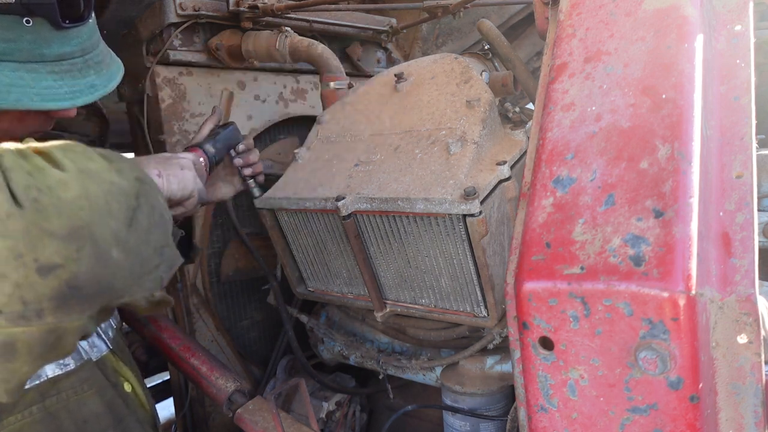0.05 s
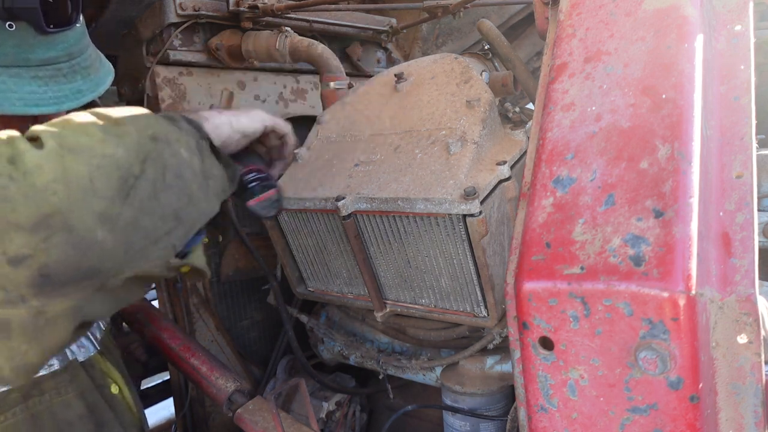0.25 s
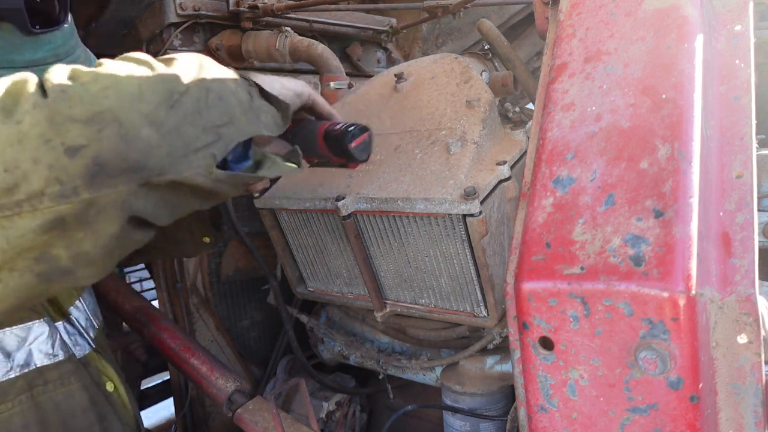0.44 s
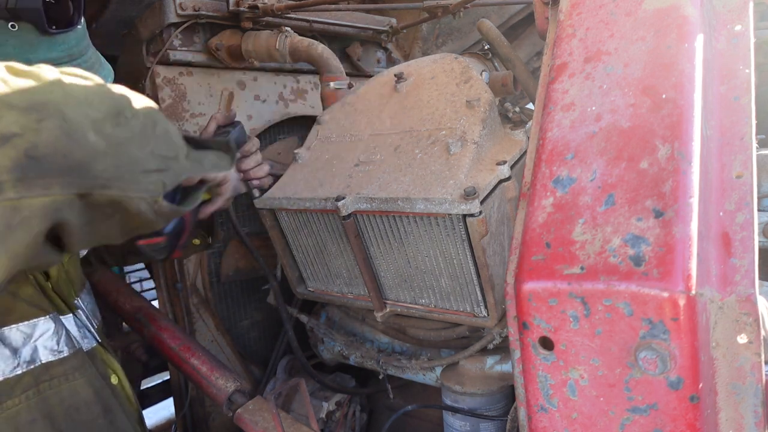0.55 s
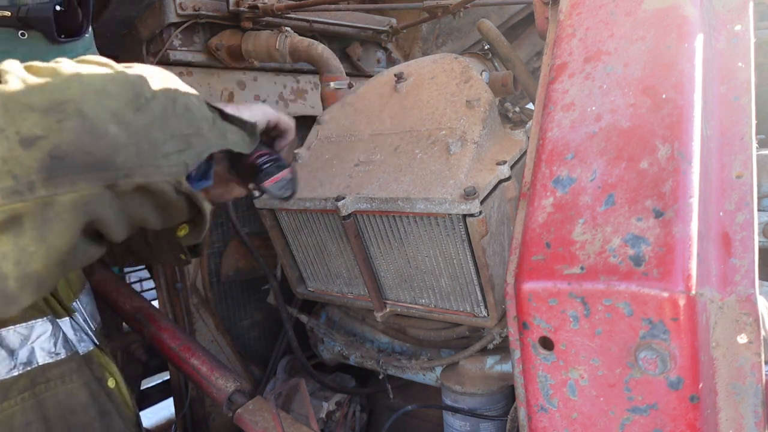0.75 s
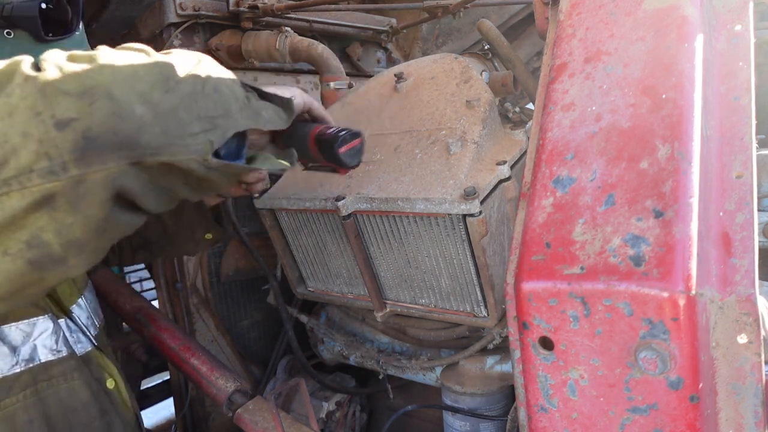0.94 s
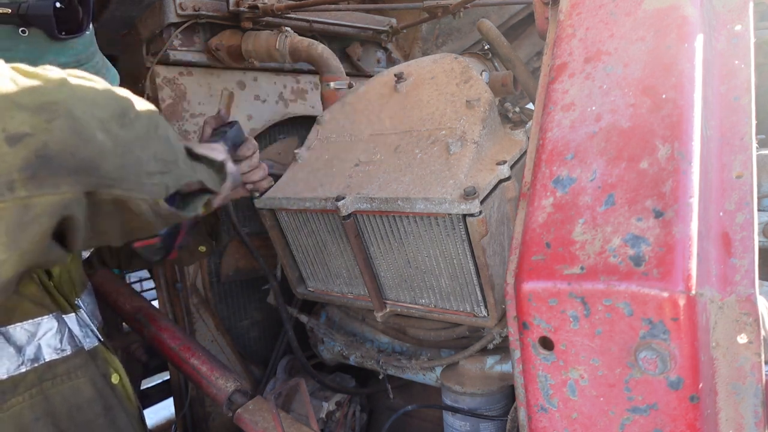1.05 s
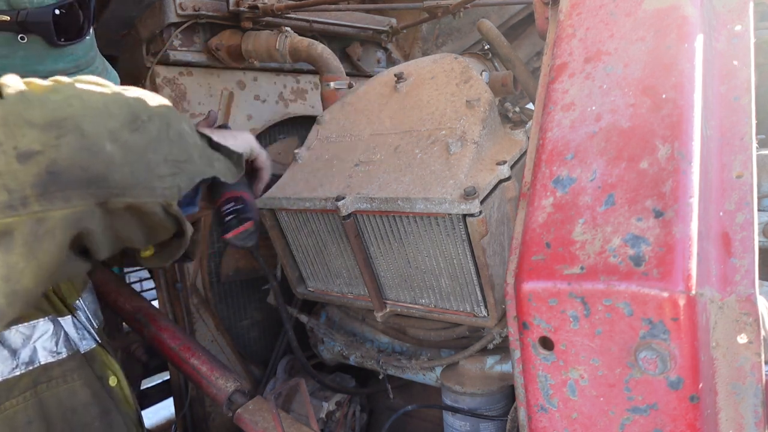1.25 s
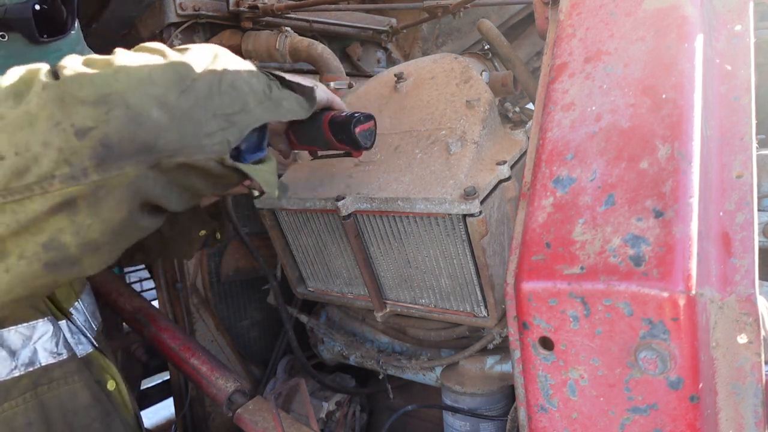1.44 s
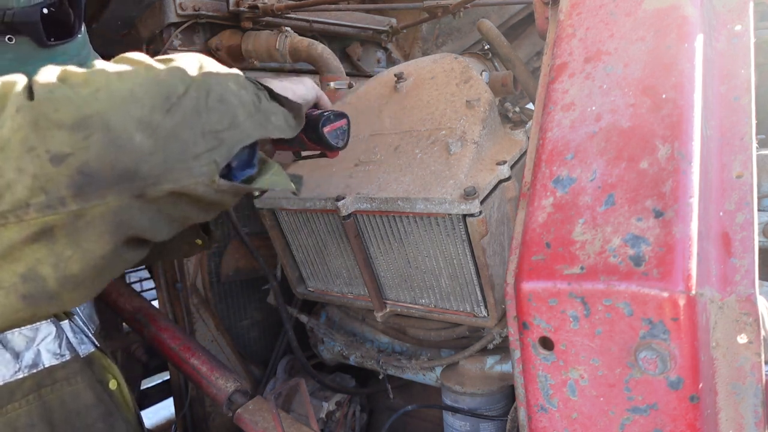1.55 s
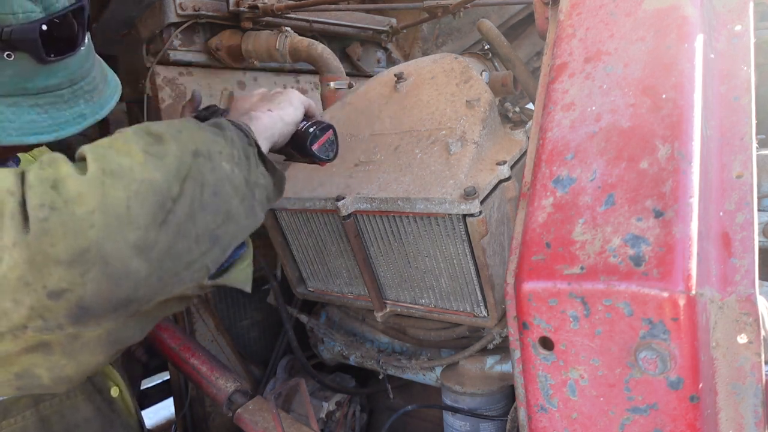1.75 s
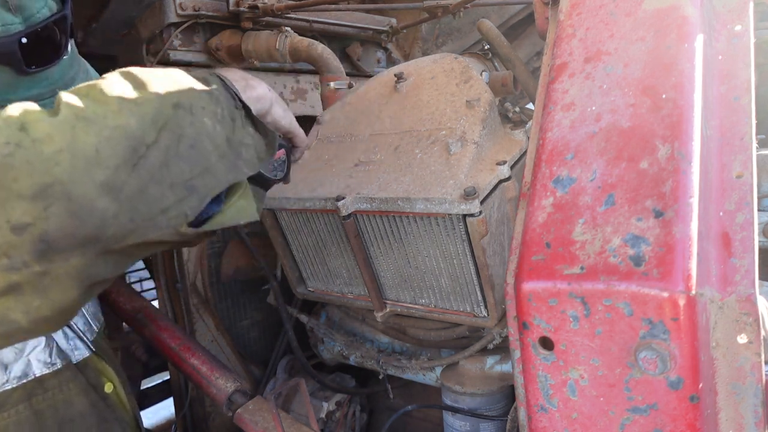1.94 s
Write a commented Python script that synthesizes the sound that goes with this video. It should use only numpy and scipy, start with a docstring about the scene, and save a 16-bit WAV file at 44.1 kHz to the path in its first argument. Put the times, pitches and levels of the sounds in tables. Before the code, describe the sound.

A ratchet clicks close by in a quiet workshop. After faint handling, a crisp run of about thirteen clicks spans 0.22-0.41 s; knocks and a scrape follow around 0.5-0.7, a second run at 0.74-0.92, a hard clack near 1.0, small rattles, then a slower, heavier run at 1.27-1.43. Steel rings briefly; light knocks, faint squeaks and sleeve rustle finish.

```python
"""Ratchet in a tractor's engine bay

In a quiet workshop, close to the microphone, a cordless ratchet is swung to and fro on a bolt.
On three back strokes the pawl snaps over the teeth: bursts of noise with a high ping and a thud.
Between them the socket knocks and scrapes on the bolt: slower bursts and uneven coloured noise.
Every blow rings the tool and nearby steel as decaying sines; steel squeaks faintly, a sleeve rustles."""
import sys
import numpy as np
from scipy import signal
from scipy.fft import rfft, irfft
from scipy.io import wavfile
from scipy.ndimage import uniform_filter1d, minimum_filter1d

SR = 44100
rng = np.random.default_rng(int(sys.argv[2]) if len(sys.argv) > 2 else 0)


def unload_wav(signal):
    """Save mono or channel-first audio to the path in sys.argv[1] as 16-bit WAV at rate SR, clipped to [-1, 1]."""
    wavfile.write(
        sys.argv[1],
        SR,
        np.round(np.clip(np.atleast_2d(signal).T, -1, 1) * 32767).astype(np.int16),
    )


N = 88200  # samples, two seconds


def amp(db):
    """Decibels to gain."""
    return 10 ** (np.asarray(db) / 20)


def fade(t, t60):
    """Exponential decay, 60 dB down after t60 seconds."""
    return np.exp(-np.log(1000) * t / t60)


def colour(x, points, size=4096):
    """Causal minimum-phase filter through (f/Hz, level/dB) points, built by folding the cepstrum."""
    hz, db = np.array(points, float).T
    f = np.maximum(np.fft.rfftfreq(size, 1 / SR), 1)
    log_gain = np.log(amp(np.interp(np.log(f), np.log(hz), db)))
    cepstrum = irfft(log_gain)
    cepstrum[1:size // 2] *= 2
    cepstrum[size // 2 + 1:] = 0
    impulse = irfft(np.exp(rfft(cepstrum)))
    return signal.fftconvolve(x, impulse)[:len(x)]


def noise(points):
    """Coloured noise of unit level."""
    x = colour(rng.standard_normal(N), points)
    return x / x.std()


def wide(points, side_db):
    """Coloured noise with some difference between left and right."""
    middle, side = noise(points), noise(points)
    return middle + amp(side_db) * side * np.array([[1], [-1]])


def curve(rows):
    """Gain along (t/s, level/dB) points."""
    s, db = np.array(rows).T
    return amp(np.interp(np.arange(N) / SR, s, db))


def add(out, at, x):
    """Mix x into out at a time in seconds."""
    i = int(at * SR)
    out[i:i + len(x)] += x[:N - i]


# colour of the air in the workshop: [f/Hz, level/dB]
SHOP_COLOUR = [(25, -29), (70, 2), (160, -5), (400, -4), (900, 5.5), (1600, 1.5), (3000, -2), (8000, -15),
               (16000, -19)]
SHOP_DB = -58


def workshop_air():
    """The quiet shop behind the work: steady coloured noise, wide across the two channels."""
    return wide(SHOP_COLOUR, side_db=-1.0) * amp(SHOP_DB)


def echoes(x, t60, points):
    """Dense reflections: the sound convolved with fading coloured noise of unit energy."""
    t = np.arange(N // 2) / SR
    h = colour(rng.standard_normal(len(t)) * fade(t, t60), points)
    return signal.fftconvolve(x, h / np.linalg.norm(h))[:N]


# colour of the quick reflections off the engine bay: [f/Hz, level/dB]
NEAR_COLOUR = [(200, -20), (1200, 1.5), (2800, -0.5), (5000, 6), (8000, 8), (12000, -1.5)]
# colour of the longer tail: [f/Hz, level/dB]
ROOM_COLOUR = [(100, 14), (800, 9.5), (1500, -19), (4000, -2), (9000, 11), (16000, -9)]
NEAR_T60_S, NEAR_DB = 0.035, -19
ROOM_T60_S, ROOM_DB = 0.14, -22.5


def surroundings(x):
    """Quick reflections off the engine bay, opposite left and right, and a faint longer tail."""
    side = amp(NEAR_DB) * echoes(x, NEAR_T60_S, NEAR_COLOUR)
    tail = np.array([echoes(x, ROOM_T60_S, ROOM_COLOUR) for _ in range(2)])
    return x + np.array([side, -side]) + amp(ROOM_DB) * tail


# low rumble of the handled machine: [t/s, level/dB]
RUMBLE = [(0, -54), (.14, -55.5), (.25, -48.5), (.5, -52.5), (.68, -45), (.9, -48), (1.12, -51),
          (1.22, -42), (1.35, -49), (1.55, -55), (2, -59)]
# its colour: [f/Hz, level/dB]
RUMBLE_COLOUR = [(25, -47), (60, -28.5), (110, -18.5), (155, -8.5), (200, -12), (330, -8.5), (600, -13),
                 (1500, -33.5)]


def rumble():
    """The handled machine rumbles: low noise that swells and sinks along the level curve."""
    return wide(RUMBLE_COLOUR, side_db=-9) * curve(RUMBLE)


def grip(rough_db=-1.5, size=180):
    """Uneven contact: smoothed noise makes the gain waver in decibels."""
    slip = uniform_filter1d(rng.standard_normal(N), size)
    return amp(rough_db * slip / slip.std())


# rustle of the sleeve: [t/s, level/dB]
SLEEVE = [(0, -68), (.04, -46.5), (.1, -70), (1.05, -71), (1.12, -41.5), (1.16, -60), (1.7, -76),
          (1.84, -53.5), (1.95, -44.5), (2, -51)]
# its colour: [f/Hz, level/dB]
SLEEVE_COLOUR = [(500, -9), (2500, 7.5), (5000, 6.5), (9000, 3.5), (16000, 1)]


def sleeve():
    """The sleeve rustles: bright noise with an uneven level."""
    return wide(SLEEVE_COLOUR, side_db=-19.0) * curve(SLEEVE) * grip()


# scraping of the socket, and of the hand on the tool: [t/s, level/dB]
SCRAPE = [(0, -46.5), (.07, -52.5), (.12, -53), (.5, -45), (.545, -38.5), (.59, -27.5), (.63, -38.5),
          (.73, -33.5), (.96, -41.5), (1.12, -42), (1.16, -48.5), (1.255, -35), (1.5, -45), (1.63, -50.5),
          (1.7, -53), (1.87, -50), (2, -59)]
# its colour: [f/Hz, level/dB]
SCRAPE_COLOUR = [(100, -16.5), (400, -4.5), (850, 8.5), (1150, 6.5), (1520, 10.5), (2000, 5), (3200, 4),
                 (5000, 0), (8000, -9.5), (16000, -22)]
RUB_RING_DB, RUB_WIDTH_HZ = -17.5, 9  # level of the singing under the scrape, width of each resonance


def scraping():
    """Uneven scraping noise drives narrow resonances, so the steel sings faintly under it."""
    scrape = wide(SCRAPE_COLOUR, side_db=-16.5) * curve(SCRAPE) * grip()
    sing = np.zeros_like(scrape)
    for hz, db, _ in MODES:
        b, a = signal.iirpeak(hz, hz / RUB_WIDTH_HZ, fs=SR)
        sing += amp(db) * signal.lfilter(b, a, scrape)
    return scrape + amp(RUB_RING_DB) * sing * scrape.std() / sing.std()


# faint squeaks of steel on steel: [t/s of the swell's peak, length/s, f/Hz, level/dB]
SQUEAKS = [(.055, .09, 1550, -53.5), (1.11, .06, 780, -47.5), (1.508, .04, 856, -50),
           (1.646, .04, 1486, -49.5), (1.875, .04, 1478, -49)]


def squeaks():
    """Sliding steel catches and sings one soft note that swells and dies."""
    out = np.zeros(N)
    for at, length, hz, db in SQUEAKS:
        t = np.arange(int(length * SR)) / SR
        swell = np.sin(np.pi * t / length)
        note = np.sqrt(2) * np.sin(2 * np.pi * (hz * t + rng.random()))
        add(out, at - length / 2, amp(db) * swell * note)
    return out


# modes of the tool and the steel around the bolt: [f/Hz, level/dB, t60/s]
MODES = [(719, -3.5, 0.062), (787, 1.5, 0.062), (862, 4.5, 0.041), (1104, 3, 0.061), (1410, -1.5, 0.073),
         (1474, -10.5, 0.12), (1533, 3, 0.059), (1946, -13, 0.048), (2257, -1, 0.083), (2378, 4.5, 0.049),
         (2890, -3, 0.031), (3145, -1, 0.08), (3400, -3.5, 0.09), (3670, 6, 0.022), (4440, -1, 0.041),
         (4780, 5, 0.02), (6080, -7.5, 0.058)]
# modes far from a blow's favoured pitch are weaker by AWAY_DB
AWAY_DB, FOCUS_OCTAVES, MODE_SCATTER_DB = -16.5, 0.21, -1


def steel(t, ring_db, focus_hz, rise):
    """The modes ring on every blow; where it lands decides which of them are strongest."""
    hz, db, t60 = np.array(MODES).T[:, :, None]
    size, phase, detune = rng.standard_normal((3, len(MODES), 1))
    away = 1 - np.exp(-(np.log2(hz / focus_hz) / FOCUS_OCTAVES) ** 2)
    gain = amp(ring_db + db + AWAY_DB * away + MODE_SCATTER_DB * size)
    tones = np.sin(2 * np.pi * (hz * (1 + 0.006 * detune) * t + phase))
    rings = gain * fade(t, t60) * tones
    onset = np.sin(np.pi / 2 * np.minimum(t / max(rise, .001), 1)) ** 2
    return np.sqrt(2) * rings.sum(axis=0) * onset


CHATTER_POWER = 2.15  # above 1 the contact breaks into a few hard micro-impacts


def blow(grain, t, rise, hold, fall, tail_db, t60, dull_hz=7000):
    """A short, bright chatter of contact, then the duller dense ring of the parts."""
    crack = np.exp(-np.maximum(t - rise - hold, 0) / fall)
    chatter = np.sign(grain) * np.abs(grain) ** CHATTER_POWER
    keep = np.exp(-2 * np.pi * dull_hz / SR)  # one-pole low-pass
    dull = signal.lfilter([1 - keep], [1, -keep], grain)
    tail = dull * amp(tail_db) * fade(np.maximum(t - rise, 0), t60)
    return np.minimum(t / rise, 1) * (chatter / chatter.std() * crack + tail * (1 - crack))


BLOW_S, LEVEL_S = .25, .015  # length of a blow, span that defines its level


def unit(x):
    """Scale a blow to the energy of LEVEL_S seconds at full level."""
    return x / np.sqrt(np.sum(x ** 2) / (LEVEL_S * SR))


# knocks of socket and tool: [t/s, clack level/dB, thud level/dB, bright edge level/dB, rise/s,
# steel ring level/dB, f/Hz around which the steel rings most]
KNOCKS = [(0.159, -56, -45.5, -59, 0.0031, -46.5, 830), (0.187, -42, -42.5, -51, 0.013, -34, 870),
          (0.4895, -22.5, -25, -23.5, 0.0051, -15, 1360), (0.5978, -24.5, -34, -22.5, 0.005, -23, 3180),
          (0.625, -50, -26, -44, 0.00031, -26, 850), (0.6659, -34.5, -30.5, -47, 0.00038, -33, 1500),
          (0.672, -37, -42, -37, 0.0015, -29, 780), (.699, -21.5, -20, -38, 0.00037, -19, 3600),
          (.7035, -34, -29, -32.5, 0.00074, -23.5, 2420), (0.7858, -29, -23.5, -51, 0.00038, -18, 980),
          (0.936, -60, -32.5, -55, 0.0007, -34.5, 810), (0.969, -33, -39.5, -45, 0.00047, -41, 2400),
          (0.9877, -33, -30.5, -44, 0.00066, -43, 1490), (0.995, -21, -27, -21.5, 0.005, -14.5, 1406),
          (1.038, -51, -34.5, -52, 0.0054, -34.5, 830), (1.172, -58, -34.5, -51, 0.0014, -33.5, 885),
          (1.1835, -48, -34, -65, 0.00028, -36, 860), (1.19, -41, -39, -65, 0.00053, -45, 1420),
          (1.2052, -36.5, -35, -39.5, 0.00028, -51, 3100), (1.209, -43, -31, -55, 0.00038, -21.5, 1390),
          (1.2367, -48, -43, -53, 0.00082, -48, 1420), (1.532, -43.5, -42.5, -40, 0.0063, -42, 3180),
          (1.55, -62, -41, -64, 0.00093, -35.5, 840), (1.5721, -35.5, -43.5, -47.5, 0.0012, -40, 3100),
          (1.738, -55, -40, -52, 0.0082, -31, 945), (1.7566, -46, -34, -49, 0.0012, -31, 1550),
          (1.7613, -41.5, -33, -48, 0.00032, -33, 1000), (1.776, -44, -40.5, -68, 0.0007, -44, 960)]
# colours of a knock's clack, thud (the pawl's too) and bright edge: [f/Hz, level/dB]
CLACK = [(600, -28), (1500, -1.5), (2400, 8.5), (3400, 6.5), (4800, -8), (7000, -15), (10000, -24),
         (16000, -21)]
THUD = [(25, -53), (60, -28), (160, -22), (350, -11.5), (560, -10.5), (800, 0), (1130, -2.5), (1480, 1),
        (1950, -4), (3000, -16.5), (8000, -79)]
EDGE = [(2000, -25), (4500, 13.5), (7000, 8.5), (10800, 5), (13000, -0.5), (16000, -5.5)]
KNOCK_HOLD_S, KNOCK_FALL_S = 0.00094, 0.001


def socket():
    """The socket takes up its play against the bolt: duller, slower blows on the same steel."""
    out, t = np.zeros(N), np.arange(int(BLOW_S * SR)) / SR
    for at, clack_db, thud_db, edge_db, rise, ring_db, focus_hz in KNOCKS:
        grain = rng.standard_normal((3, len(t)))
        contact = (t, rise, KNOCK_HOLD_S, KNOCK_FALL_S)
        clack = colour(blow(grain[0], *contact, tail_db=0, t60=0.055), CLACK)
        thud = colour(blow(grain[1], *contact, tail_db=0, t60=0.061), THUD)
        edge = colour(blow(grain[2], *contact, tail_db=-0.5, t60=0.06), EDGE)
        knock = amp(clack_db) * unit(clack) + amp(thud_db) * unit(thud) + amp(edge_db) * unit(edge)
        add(out, at, knock + steel(t, ring_db, focus_hz, rise))
    return out


UNEVEN_DB = 3  # spread of the gains from tooth to tooth


def uneven(x, count=36):
    """Each tooth is met at another spot, which favours some narrow resonances and starves others."""
    hz = np.geomspace(700, 14000, count)
    return colour(x, np.column_stack([hz, UNEVEN_DB * rng.standard_normal(count)]))


# pawl clicks: [t/s, snap level/dB, housing thud level/dB, pawl ping level/dB, ping f/Hz,
# steel ring level/dB, f/Hz around which the steel rings most]
CLICKS = [(0.2235, -24, -34, -26.5, 9300, -22, 4900), (0.236, -25, -31, -23, 9280, -40, 5000),
          (.25, -23.5, -35, -23.5, 9300, -30, 1520), (0.2635, -23.5, -29.5, -21.5, 9550, -25, 1400),
          (.277, -23, -33, -23, 9630, -27.5, 1540), (0.291, -25, -29, -22, 9700, -33, 1560),
          (0.3073, -25.5, -29.5, -20, 9550, -25, 1360), (0.3206, -28.5, -28.5, -25, 10060, -30, 1520),
          (.336, -25.5, -31.5, -29, 9800, -28, 4740), (0.3496, -26.5, -33, -27, 10380, -30, 4740),
          (.369, -22, -33, -27, 10550, -16, 5900), (0.388, -21.5, -30, -24.5, 10500, -34, 2370),
          (.412, -24.5, -28.5, -28, 10400, -41, 2360), (.742, -22.5, -33, -26, 11000, -24.5, 2400),
          (0.7595, -19, -23, -31, 10500, -33, 2410), (0.7766, -21.5, -30.5, -26.5, 9800, -33, 1570),
          (0.7898, -25, -42, -25.5, 9860, -31, 2360), (0.8135, -22, -34, -20, 9900, -26, 3800),
          (0.8354, -24.5, -38, -20.5, 9800, -29, 4800), (0.8534, -24, -31, -24, 9700, -29, 830),
          (.87, -18, -40, -25, 10130, -22, 4650), (.888, -22, -32, -27, 9440, -19.5, 4800),
          (0.9047, -18, -28.5, -24, 9700, -22.5, 2350), (0.923, -20.5, -37, -26.5, 9700, -21, 3280),
          (1.2706, -24, -24, -28, 10100, -17.5, 3430), (1.2858, -20.5, -23, -31, 10000, -21, 1560),
          (1.3022, -16.5, -23.5, -35, 9600, -20.5, 1620), (1.3275, -22, -26.5, -31.5, 9800, -22, 1530),
          (1.3524, -18, -32.5, -38, 10300, -20.5, 1460), (1.3786, -20, -27.5, -31, 9900, -20.5, 3370),
          (1.402, -18.5, -28, -32, 10200, -17, 3320), (1.4261, -19, -27.5, -28.5, 8600, -22, 1430)]
# colour of the snap: [f/Hz, level/dB]
SNAP = [(700, -45), (1800, -8.5), (2400, 1), (3400, 2), (4800, 4.5), (6200, -0.5), (7600, -3),
        (10500, -4.5), (12500, -9), (16000, -10.5)]
CLICK_RISE_S, CLICK_HOLD_S, CLICK_FALL_S = 0.000086, 0.0021, 0.00039
PING_PASS_HZ = 1140  # width of each of the ping's two filter passes
ALIKE = 0.64  # share of its fine grain that a click has in common with the others


def pawl():
    """The pawl drops off a tooth: a snap, its own high ping, a thud of the housing and ringing steel."""
    out, t = np.zeros(N), np.arange(int(BLOW_S * SR)) / SR
    common = rng.standard_normal((3, len(t)))
    contact = (t, CLICK_RISE_S, CLICK_HOLD_S, CLICK_FALL_S)
    for at, snap_db, thud_db, ping_db, hz, ring_db, focus_hz in CLICKS:
        own = rng.standard_normal(common.shape)
        grain = np.sqrt(ALIKE) * common + np.sqrt(1 - ALIKE) * own
        crack = blow(grain[0], *contact, tail_db=-1, t60=0.062, dull_hz=5240)
        snap = colour(uneven(crack), SNAP)
        # the housing answers a little more slowly
        thud_drive = blow(grain[1], t, 0.00033, CLICK_HOLD_S, CLICK_FALL_S, tail_db=0.5, t60=0.074)
        thud = colour(thud_drive, THUD)
        ping_drive = blow(grain[2], *contact, tail_db=-6.5, t60=0.081)
        b, a = signal.iirpeak(hz, hz / PING_PASS_HZ, fs=SR)
        ping = signal.lfilter(b, a, signal.lfilter(b, a, ping_drive))
        click = amp(snap_db) * unit(snap) + amp(thud_db) * unit(thud) + amp(ping_db) * unit(ping)
        add(out, at, click + steel(t, ring_db, focus_hz, CLICK_RISE_S))
    return out


BODY_HZ = 195  # the small parts radiate little below this
LEFT_OVER_RIGHT_DB = -0.47  # balance of the tool between the channels


def scene():
    """Ratchet and handling close to the microphone, with the air of the shop behind."""
    high_pass = signal.butter(3, BODY_HZ, "high", fs=SR, output="sos")
    blows = signal.sosfilt(high_pass, pawl() + socket())
    handling = scraping() + sleeve() + rumble()
    tool = surroundings(blows + squeaks()) + handling
    balance = amp(np.array([[LEFT_OVER_RIGHT_DB], [-LEFT_OVER_RIGHT_DB]]) / 2)
    return tool * balance + workshop_air()


LIMIT_DB, LIMIT_S = -2.5, .002  # limiter threshold and smoothing time
TOP_HZ = 15900  # upper edge of the recorded band


def record(dry):
    """The recorder holds down the highest peaks and cuts the top."""
    size = int(LIMIT_S * SR)
    peak = np.abs(dry).max(axis=0)
    allowed = amp(LIMIT_DB) / np.maximum(peak, amp(LIMIT_DB))
    gain = uniform_filter1d(minimum_filter1d(allowed, 2 * size), size)
    low_pass = signal.ellip(10, .2, 70, TOP_HZ, fs=SR, output="sos")
    return signal.sosfilt(low_pass, dry * gain)


dry = scene()
out = record(dry)
unload_wav(out)
```